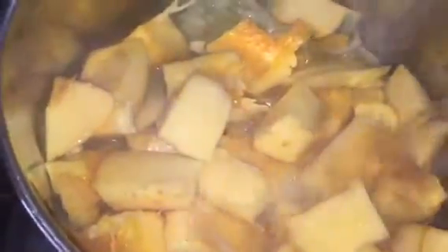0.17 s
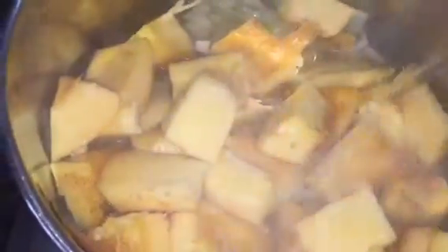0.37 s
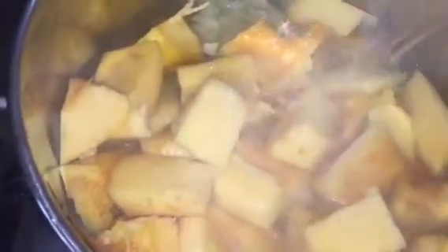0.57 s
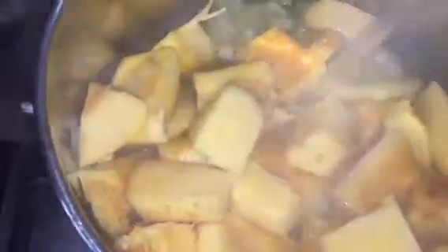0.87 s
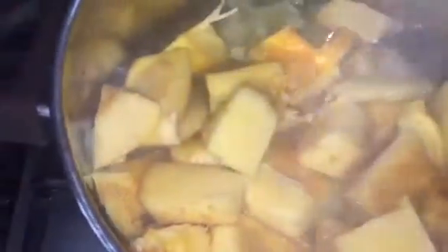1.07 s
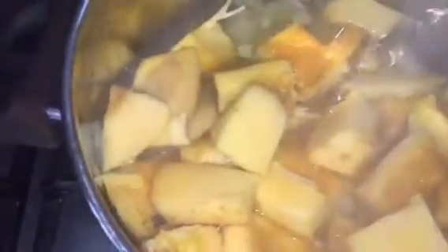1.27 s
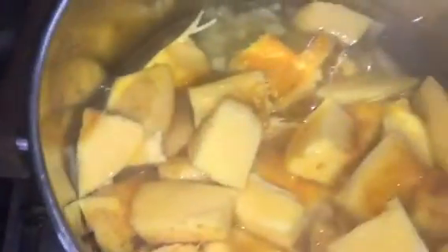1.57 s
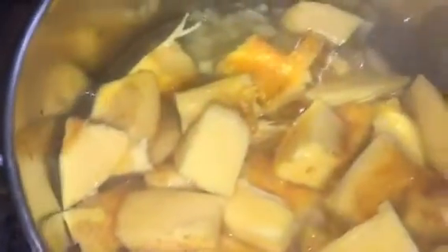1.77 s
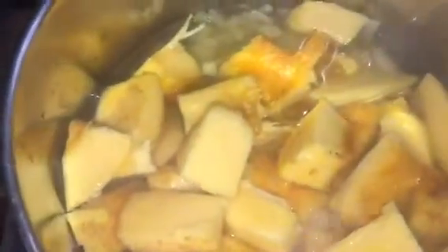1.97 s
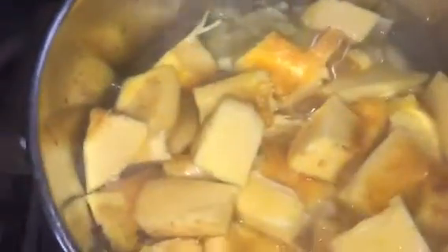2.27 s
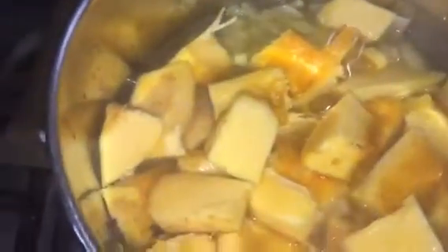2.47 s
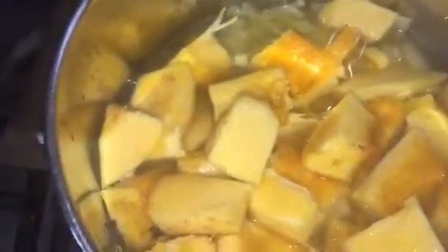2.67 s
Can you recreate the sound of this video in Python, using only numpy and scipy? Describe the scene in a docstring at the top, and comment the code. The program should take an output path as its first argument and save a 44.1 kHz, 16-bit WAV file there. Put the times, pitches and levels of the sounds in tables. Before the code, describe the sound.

Close-up in a small, dry kitchen, a thin stream of water fizzes and bubbles onto vegetables, ending in fat bright drops; a few faint drips follow, then a heavy dull thud, short scrape and hard metallic knock.

```python
"""Boiling water is poured over cut vegetables in a steel pot, close by in a quiet kitchen.
The stream patters, gurgles and briefly sizzles (clicks and ringing bubbles), then breaks up
into fat splats (noise bursts) and stops; a few drops and bubbles (rising sines) follow.
Something heavy, probably the kettle, lands with a dull thud, scrapes along the worktop and ends
in a clack and a loud ringing knock (noise bands and decaying modes). Room tone runs throughout."""
import sys
import numpy as np
from scipy import signal
from scipy.fft import rfft, irfft
from scipy.io import wavfile

SR = 44100
rng = np.random.default_rng(int(sys.argv[2]) if len(sys.argv) > 2 else 0)


def file_out(sig):
    """Save sig as 16-bit WAV at sys.argv[1]."""
    # one column per channel
    cols = np.atleast_2d(sig).T
    # limit, then scale
    lim = np.clip(cols, -1, 1)
    pcm = np.round(lim * 32767).astype(np.int16)
    wavfile.write(sys.argv[1], SR, pcm)


N = 123479
T = np.arange(N) / SR
THIRD_OCTAVE_EDGES_HZ = 35 * 2 ** (np.arange(28) / 3)

# All levels in the tables are relative: the mix scales them further.
# Spray of the stream. Each row: time in seconds, level in dB.
SPRAY_LEVEL = [(0, -62), (.025, -57.5), (.06, -44), (.09, -46), (.12, -55.5), (.185, -59.5), (.215, -52.5),
               (.27, -66.5), (.325, -50), (.41, -47.5), (.45, -52.5), (.54, -55), (.68, -51.5), (.72, -62),
               (.78, -58.5), (.82, -54), (.94, -55), (1.0, -52.5), (1.125, -45.5), (1.22, -66), (1.5, -73)]
# Spectrum of the spray. Each row: frequency in Hz, density in dB per Hz.
SPRAY_COLOUR = [(880, -43), (1500, -1), (1620, -10.5), (1880, -4), (2970, -5.5), (4270, -10), (6370, 2.5),
                (7670, -14), (8290, 3), (8970, -3), (15500, -2.5)]
# Water churning between the vegetables. Each row: time in seconds, level in dB.
CHURN_LEVEL = [(0, -76), (.095, -50), (.15, -65.5), (.26, -71.5), (.39, -55), (.45, -58), (.55, -58),
               (.6, -50.5), (.65, -59), (.71, -47.5), (.79, -49), (.85, -64), (.9, -58.5), (1.0, -48.5),
               (1.11, -61.5), (1.16, -71), (1.26, -80)]
# Water sizzling on the hot steel. Each row: time in seconds, level in dB.
SIZZLE_LEVEL = [(.3, -65), (.335, -57.5), (.47, -64), (.55, -55), (.62, -67), (.69, -76)]
# Bands of a splat, body to treble. Each row: low edge in Hz, high edge in Hz.
SPLAT_BANDS_HZ = [(500, 1850), (1600, 3800), (3700, 8400), (7400, 16500)]
# Drops that hit the pot. Each row: time in seconds, body, low mids, presence and treble in dB.
SPLATS = [(.0325, -63, -45.5, -48, -52), (.0585, -59, -42.5, -44, -44), (0.07, -69, -57, -39, -47),
          (0.0886, -54, -66, -43, -43), (0.1354, -64, -47.5, -37.5, -37), (0.2145, -56.5, -39, -43.5, -61),
          (.305, -78, -49, -44, -37), (0.3237, -54, -35.5, -43.5, -57), (0.3895, -33.5, -29, -28.5, -30.5),
          (0.412, -60, -39, -37, -40), (.5286, -73, -51, -35.5, -45), (0.608, -43.5, -47, -57, -38),
          (0.6239, -68, -66, -32, -33), (0.6279, -58, -73, -44, -37), (.6444, -55, -60, -27.5, -35),
          (0.6663, -43.5, -64, -35, -45), (0.686, -38, -43, -31, -39), (0.8085, -40, -75, -36.5, -35),
          (0.8245, -66, -69, -51, -34.5), (.846, -70, -72, -36.5, -42), (0.8582, -87, -73, -40, -33.5),
          (0.8843, -48, -70, -51, -35), (.8973, -43, -52, -48, -35.5), (0.9136, -42, -52, -35, -33),
          (0.923, -45, -65, -37.5, -31.5), (.95, -37, -43, -45, -27.5), (0.9572, -35, -37.5, -31.5, -30.5),
          (0.9817, -25, -27.5, -50, -17.5), (.9828, -28, -52, -25.5, -46), (0.9964, -61, -39, -50, -24.5),
          (1.003, -36, -34, -42, -26.5), (1.0194, -61, -42, -29.5, -45), (1.023, -27, -32, -23.5, -17.5),
          (1.054, -25.5, -30.5, -32.5, -34), (1.0733, -40, -30.5, -27, -18.5),
          (1.0896, -27, -34, -31.5, -19), (1.0909, -39.5, -39, -31.5, -44), (1.1029, -46, -55, -25, -21),
          (1.104, -34.5, -47, -33, -46), (1.1168, -33.5, -25, -29.5, -19), (1.138, -47, -41.5, -32, -22.5),
          (1.1792, -50.5, -73, -62, -29), (1.2732, -76, -72, -58, -59), (1.38, -85, -79, -60, -49.5),
          (1.3889, -83, -72, -68, -51), (1.567, -76, -74, -67, -53), (1.804, -85, -53.5, -55.5, -63),
          (1.8733, -77, -67, -42.5, -64), (1.941, -69, -58, -58.5, -61)]
# Single loud bubbles. Each row: start in seconds, starting pitch in Hz, peak in dB.
PLIPS = [(0.2042, 2580, -29.5), (0.2227, 2340, -35), (.309, 2600, -36), (.3235, 2070, -36),
         (0.6428, 4050, -47), (0.6871, 5240, -23), (0.7562, 1440, -41), (0.7703, 2020, -34),
         (0.807, 6500, -23), (0.836, 2670, -48), (0.9904, 2550, -28), (1.0574, 3050, -30),
         (1.117, 2270, -33.5), (1.179, 7000, -18), (1.873, 5940, -38), (1.875, 4030, -41.5)]
# Resonances of the air in the pot. Each row: frequency in Hz, level in dB, T60 in seconds.
POT_AIR_MODES = [(339, 2.5, .07), (657, -4.5, 0.013), (1028, -14, 0.11), (1334, 5, 0.021), (1810, -4, .04),
                 (2232, 6, 0.042), (3175, 0, 0.043), (6050, -11, 0.018)]
# Rumble of the pot's bottom. Each row: time in seconds, level in dB.
RUMBLE_LEVEL = [(.92, -87), (1.04, -67), (1.12, -55.5), (1.2, -66.5), (1.27, -80)]
# Spectrum of that rumble. Each row: frequency in Hz, density in dB per Hz.
RUMBLE_COLOUR = [(25, -15), (55, 5.5), (85, 1), (130, -22), (350, -11), (600, -41), (2000, -70)]
# Soft landings of the kettle's weight. Each row: start in seconds, level in dB.
THUDS = [(2.389, -5), (2.402, -6), (2.604, -7.5), (2.625, -4), (2.74, -14.5)]
# Noise answer of the worktop. Each row: frequency in Hz, starting level in dB, T60 in seconds.
WORKTOP_NOISE = [(144, -32, 0.45), (215, -25.5, 0.19), (303, -35.5, 0.49), (590, -33, 0.11),
                 (850, -47, 0.49), (1400, -42, 0.46), (2130, -40, 0.37), (2700, -45.5, 0.27),
                 (3370, -57.5, 0.5), (7000, -62.5, 0.24), (15000, -86, .25)]
# Tones of the worktop. Each row: frequency in Hz, starting level in dB, T60 in seconds.
WORKTOP_MODES = [(315, -22.5, 0.1), (446, -32, 0.15), (638, -29, 0.21)]
# Deep booms of the worktop. Each row: start in seconds, level in dB.
BOOMS = [(0.59, -61.5), (1.623, -64), (2.399, -29), (2.606, -35.5), (2.631, -30), (2.744, -37.5)]
# Tones of a boom. Each row: frequency in Hz, starting level in dB, T60 in seconds.
BOOM_MODES = [(70.5, 11.5, 0.18), (134.8, -12.5, 0.49), (220, -3, .25)]
# Scrape of the sliding kettle. Each row: time in seconds, level in dB.
SLIDE_LEVEL = [(2.388, -56), (2.4, -45.5), (2.46, -50), (2.515, -54), (2.55, -49.5), (2.6, -43),
               (2.62, -62)]
# Spectrum of the scrape. Each row: frequency in Hz, density in dB per Hz.
SLIDE_COLOUR = [(150, -22), (350, 2), (700, -3.5), (1000, 4.5), (1400, -12), (1800, -2), (2500, -2),
                (3600, -22.5), (8000, -27.5), (15000, -39)]
# Hiss of the sliding base. Each row: time in seconds, level in dB.
SWISH_LEVEL = [(2.5, -85), (2.515, -63), (2.545, -66), (2.6, -68)]
# Hard contacts of the kettle. Each row: start in seconds, level in dB, tilt in dB per octave.
KNOCKS = [(2.504, -64, 24.5), (2.6027, -8, 4.5), (2.6241, -0.5, 2.5), (2.6308, -3.5, 1.5),
          (2.6368, -22.5, -8.5), (2.679, -22, 9)]
# Crack of a contact. Each row: frequency in Hz, starting level in dB.
CRACK_COLOUR = [(300, -25), (1000, -22), (1700, -17), (2400, -3), (3800, -21), (5600, -8), (7800, -26),
                (15000, -36.5)]
# Knock spreading through the kitchen. Each row: frequency in Hz, starting level in dB, T60 in seconds.
KNOCK_TAIL = [(300, -51.5, 0.22), (1060, -40, 0.5), (1780, -32, 0.35), (2430, -31.5, 0.4),
              (4200, -46.5, 0.49), (5450, -30, 0.29), (7100, -56.5, 0.57), (9370, -41, 0.22),
              (14800, -61, .2)]
# Modes of the kettle's shell. Each row: frequency in Hz, starting level in dB, T60 in seconds.
SHELL_MODES = [(1813, -32, .3), (2103, -28, .5), (2124, -27, .4), (2270, -23, .22), (2442, -23, .22),
               (2854, -26, .22), (3031, -27, .3), (3210, -31, .35), (3362, -34, .3), (4612, -33, .22),
               (5304, -30, .2), (5483, -31, .25), (5712, -35, .24), (6236, -36, .25)]
# Spectrum of the room tone. Each row: frequency in Hz, density in dB per Hz.
ROOM_TONE_COLOUR = [(18, -51.5), (30, -9.5), (85, -1), (111, -2), (152, -13.5), (263, -11.5), (292, -12.5),
                    (546, -13.5), (921, -18), (1820, -23.5), (2240, -32.5), (3230, -27.5), (3980, -22.5),
                    (4910, -26), (6050, -25), (7260, -28.5), (15500, -31)]

DROPLETS_PER_S, DROPLET_SPREAD_DB, DROPLET_DB = 4300, 7.5, -3.5
FIZZ_PER_S, FIZZ_SPREAD_DB, FIZZ_CYCLES, FIZZ_DB = 1600, 7, 48, -4
BUBBLES_PER_S, BUBBLE_SPREAD_DB, BUBBLE_CYCLES, CHURN_DB = 740, 3, 16.5, -8
GLUG_AT_S, GLUG_WIDTH_S, GLUG_DB, GLUGS_PER_S = 1.043, 0.087, -55.5, 300
SIZZLE_HZ, SIZZLES_PER_S = 6600, 1500
SPLAT_LEAD_S, SPLAT_LEAD_DB = 0.0016, -10  # noise swelling up just ahead of each slap
SPLAT_DECAY_S, SPLASH_DECAY_S, SPLASH_DB = .0005, .004, -18
SPLAT_RING_DB, SPLAT_RING_CYCLES = 3, 5  # tiny cavities give each drop a colour of its own
SPLAT_TOP_HZ, SPLAT_MIX_DB = 12640, -5.5
PLIP_CYCLES, PLIP_RISE_PER_S, PLIP_MIX_DB = 42, 6, -4.5
KITCHEN_T60_S, POT_ROOM_DB = 0.081, -17
THUD_ATTACK_S, THUD_SNAP_DB, THUD_SNAP_T60_S = 0.001, -29, 0.025
SLIPS_PER_S, SLIP_SPREAD_DB = 1800, 1
CRACK_T60_S, SHELL_DB, TILT_PIVOT_HZ = 0.014, -5, 4000
ROOM_TONE_DB, ROOM_HISS_HZ, ROOM_HISS_T60_S, ROOM_HISS_DB = -68, 2230, 0.0082, -72
MIC_LOW_HZ, CLIP_LEVEL, CUTOFF_HZ = 42, .8, 16000


def from_db(db):
    """Decibels to gain."""
    return 10 ** (np.asarray(db) / 20)


def rms_one(x):
    """Scale to rms 1."""
    return x / np.sqrt(np.mean(x ** 2) + 1e-20)


def at_hz(rows, hz, axis=1):
    """Read one column of a table on a log-frequency axis."""
    rows = np.array(rows)
    return np.interp(np.log(hz), np.log(rows[:, 0]), rows[:, axis])


def band(x, low_hz, high_hz):
    """Causal band-pass."""
    return signal.sosfilt(signal.butter(2, [low_hz, high_hz], "band", fs=SR, output="sos"), x)


def dying(t, t60):
    """Envelope that loses 60 dB in t60."""
    return np.exp(-np.log(1000) * t / t60)


def modes(rows, t):
    """Sum of decaying sines."""
    return sum(from_db(db) * dying(t, t60) * np.sin(2 * np.pi * hz * t) for hz, db, t60 in rows)


def add(out, s, x):
    """Mix x in at time s."""
    i = int(s * SR)
    out[i:i + len(x)] += x[:max(N - i, 0)]


def resonance(x, hz, t60):
    """Two-pole resonance with gain near 1 at its centre."""
    r = dying(1 / SR, t60)
    zeros = np.array([1, 0, -1]) * (1 - r * r) / 2
    poles = [1, -2 * r * np.cos(2 * np.pi * hz / SR), r * r]
    return signal.lfilter(zeros, poles, x + 1e-18)


def coloured(x, spectrum):
    """Give x a spectrum through a causal (minimum-phase) filter; rms 1."""
    size = 8192
    hz = np.maximum(np.arange(size // 2 + 1) * SR / size, 1)
    cepstrum = irfft(np.log(from_db(at_hz(spectrum, hz))))
    # Fold onto positive times for minimum phase.
    cepstrum[1:size // 2] *= 2
    cepstrum[size // 2 + 1:] = 0
    impulse = irfft(np.exp(rfft(cepstrum)))
    return rms_one(signal.fftconvolve(x, impulse)[:N])


def noise_bands(lowest_hz):
    """Half a second of noise in third octaves: (centre Hz, noise of rms 1)."""
    edges = zip(THIRD_OCTAVE_EDGES_HZ, THIRD_OCTAVE_EDGES_HZ[1:])
    return [(np.sqrt(low * high), rms_one(band(rng.standard_normal(SR // 2), low, high)))
            for low, high in edges if high > lowest_hz]


def grains(per_s, spread_db):
    """Random clicks of either sign, their dB offsets exponentially spread and capped."""
    hits = rng.random(N) < per_s / SR
    sizes = from_db(spread_db * np.minimum(rng.exponential(1, N), 4))
    return hits * sizes * rng.choice([-1, 1], N)


def flow(curve):
    """Gain of a level curve, silent before it and fading after it."""
    s, db = np.transpose(curve)
    level = from_db(np.interp(T, s, db, left=-200))
    return level * dying(np.maximum(T - s[-1], 0), 0.99)


def bubble_cloud(pitches_hz, levels_db, per_s, spread_db, cycles):
    """Random bubbles dealt over a range of pitches, each losing 60 dB in some cycles; rms 1."""
    cloud = np.zeros(N)
    for hz, db in zip(pitches_hz, levels_db):
        clicks = grains(per_s / len(pitches_hz), spread_db)
        cloud += from_db(db) * rms_one(resonance(clicks, hz, cycles / hz))
    return rms_one(cloud)


def spray():
    """Fine droplets tick on the vegetables and tiny bubbles fizz."""
    ticks = coloured(grains(DROPLETS_PER_S, DROPLET_SPREAD_DB), SPRAY_COLOUR)
    pitches_hz = np.geomspace(2000, 15000, 26)
    # Log-spaced pitches: density per Hz becomes level per bubble band.
    levels_db = at_hz(SPRAY_COLOUR, pitches_hz) + 10 * np.log10(pitches_hz)
    fizz = bubble_cloud(pitches_hz, levels_db, FIZZ_PER_S, FIZZ_SPREAD_DB, FIZZ_CYCLES)
    return flow(SPRAY_LEVEL) * (from_db(DROPLET_DB) * ticks + from_db(FIZZ_DB) * fizz)


def churn():
    """Short-lived bubbles gurgle where the stream plunges in; the last fat drops add a low glug."""
    pitches_hz = np.geomspace(640, 2500, 16)
    levels_db = -4 * np.abs(np.log2(pitches_hz / 1250))
    gurgle = bubble_cloud(pitches_hz, levels_db, BUBBLES_PER_S, BUBBLE_SPREAD_DB, BUBBLE_CYCLES)
    low_hz = np.geomspace(190, 420, 6)
    glug = bubble_cloud(low_hz, np.zeros(len(low_hz)), GLUGS_PER_S, spread_db=-2.0, cycles=3.5)
    glug_hump = 1 / (1 + ((T - GLUG_AT_S) / GLUG_WIDTH_S) ** 4)
    return from_db(CHURN_DB) * flow(CHURN_LEVEL) * gurgle + from_db(GLUG_DB) * glug * glug_hump


def splats():
    """Each drop is a sharp noise slap within a short splash, in four bands with a brief ring."""
    out, t = np.zeros(N), T[:SR // 20] - .01
    slap_decay = np.exp(-np.abs(t) / SPLAT_DECAY_S)
    splash_decay = from_db(SPLASH_DB) * np.exp(-np.abs(t) / SPLASH_DECAY_S)
    lead = from_db(SPLAT_LEAD_DB) * np.exp(-np.abs(t) / SPLAT_LEAD_S)
    shape = np.where(t < 0, lead, slap_decay + splash_decay)
    for s, *levels_db in SPLATS:
        for (low, high), db in zip(SPLAT_BANDS_HZ, levels_db):
            slap = shape * rng.standard_normal(len(t))
            hz = low + (high - low) * rng.uniform(0.1, 0.782)
            slap = slap + from_db(SPLAT_RING_DB) * resonance(slap, hz, SPLAT_RING_CYCLES / hz)
            burst = band(band(slap, low, high), low, high)
            # The level is the rms if all the energy fell within 2 ms.
            add(out, s + t[0], from_db(db) * burst / np.sqrt(np.sum(burst ** 2) / (.002 * SR)))
    return out


def soften(x):
    """The soft vegetables dull each slap: a gentle low-pass on the highest treble."""
    return signal.sosfilt(signal.butter(2, min(SPLAT_TOP_HZ, .45 * SR), fs=SR, output="sos"), x)


def plips():
    """Larger bubbles ring and rise a little in pitch."""
    out, t = np.zeros(N), T[:SR // 20]
    for s, hz, db in PLIPS:
        tone = np.sin(2 * np.pi * hz * (t + PLIP_RISE_PER_S * t * t / 2))
        add(out, s, from_db(db) * dying(t, PLIP_CYCLES / hz) * tone)
    return out


def sizzle():
    """Tiny steam bubbles burst on the hot steel."""
    pitches_hz = SIZZLE_HZ * np.geomspace(.91, 1.1, 6)
    levels_db = np.zeros(len(pitches_hz))
    return flow(SIZZLE_LEVEL) * bubble_cloud(pitches_hz, levels_db, SIZZLES_PER_S, spread_db=3.6, cycles=24)


def pot(water):
    """The air in the pot colours the water, and the kitchen answers faintly."""
    x = water + sum(from_db(db) * resonance(water, hz, t60) for hz, db, t60 in POT_AIR_MODES)
    tail = band(rng.standard_normal(SR // 2), 100, 6100) * dying(T[:SR // 2], KITCHEN_T60_S)
    return x + from_db(POT_ROOM_DB) * signal.fftconvolve(x, tail / np.linalg.norm(tail))[:N]


def rumble():
    """The pot's bottom rumbles under the last drops: low coloured noise."""
    return flow(RUMBLE_LEVEL) * coloured(rng.standard_normal(N), RUMBLE_COLOUR)


def knocks():
    """Each hard contact cracks, rings the shell and spreads through the room."""
    out, t = np.zeros(N), T[:SR // 2]
    for s, db, tilt_db in KNOCKS:
        hit = np.zeros(len(t))
        for hz, noise in noise_bands(250):
            crack = from_db(at_hz(CRACK_COLOUR, hz)) * dying(t, CRACK_T60_S)
            tail = from_db(at_hz(KNOCK_TAIL, hz)) * dying(t, at_hz(KNOCK_TAIL, hz, axis=2))
            hit += noise * (crack + tail) * from_db(tilt_db * np.log2(hz / TILT_PIVOT_HZ))
        for hz, mode_db, t60 in SHELL_MODES:
            gain = from_db(SHELL_DB + mode_db + tilt_db * np.log2(hz / TILT_PIVOT_HZ))
            hit += gain * dying(t, t60) * np.sin(2 * np.pi * (hz * t + rng.random()))
        add(out, s, from_db(db) * hit)
    return out


def thuds():
    """The weight lands on the worktop: dull burst, woody snap and deep boom; faint booms come earlier."""
    out, t = np.zeros(N), T[:SR // 2]
    swell = 1 - np.exp(-t / THUD_ATTACK_S)
    for s, db in THUDS:
        body = modes(WORKTOP_MODES, t)
        for hz, noise in noise_bands(100):
            body += noise * from_db(at_hz(WORKTOP_NOISE, hz)) * dying(t, at_hz(WORKTOP_NOISE, hz, axis=2))
        woody = rms_one(band(band(rng.standard_normal(len(t)), 1300, 2240), 1300, 2600))
        snap = from_db(THUD_SNAP_DB) * dying(t, THUD_SNAP_T60_S) * woody
        add(out, s, from_db(db) * (swell * body + snap))
    boom = modes(BOOM_MODES, t)
    for s, db in BOOMS:
        add(out, s, from_db(db) * swell * boom)
    return out


def slide():
    """The kettle's base scrapes (dense clicks) and hisses (band noise) along the worktop."""
    scrape = coloured(grains(SLIPS_PER_S, SLIP_SPREAD_DB), SLIDE_COLOUR)
    swish = rms_one(band(rng.standard_normal(N), 6400, 12500))
    return flow(SLIDE_LEVEL) * scrape + flow(SWISH_LEVEL) * swish


def room_tone():
    """Low rumble of the kitchen with a thin steady hiss."""
    low = coloured(rng.standard_normal(N), ROOM_TONE_COLOUR)
    hiss = rms_one(resonance(rng.standard_normal(N), ROOM_HISS_HZ, ROOM_HISS_T60_S))
    return from_db(ROOM_TONE_DB) * low + from_db(ROOM_HISS_DB) * hiss


def scene():
    """The pour, then the kettle put down, over the room tone."""
    water = spray() + sizzle() + churn()
    water += from_db(SPLAT_MIX_DB) * soften(splats()) + from_db(PLIP_MIX_DB) * plips()
    kettle = thuds() + slide() + knocks()
    return (pot(water) + rumble() + kettle + room_tone())[None]


def record(dry):
    """The microphone drops the deepest bass, peaks are clipped and the top is cut."""
    x = signal.sosfilt(signal.butter(4, MIC_LOW_HZ, "high", fs=SR, output="sos"), dry)
    clipped = np.clip(x, -CLIP_LEVEL, CLIP_LEVEL)
    return signal.sosfilt(signal.ellip(10, .2, 80, CUTOFF_HZ, fs=SR, output="sos"), clipped)


dry = scene()
out = record(dry)
file_out(out)
```